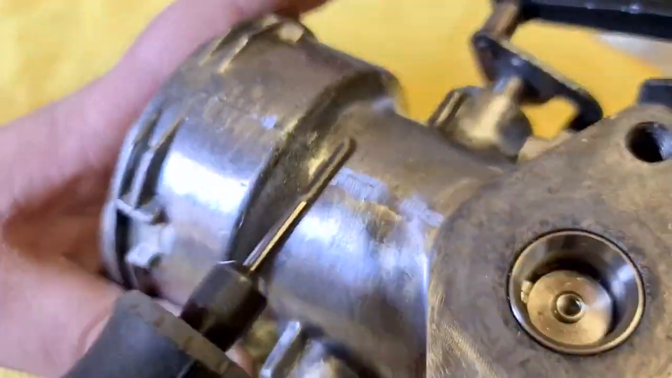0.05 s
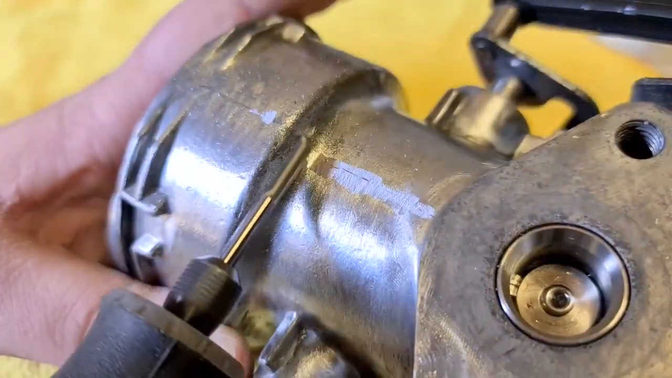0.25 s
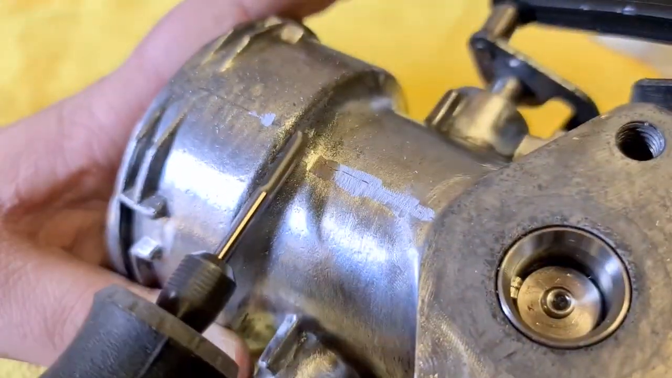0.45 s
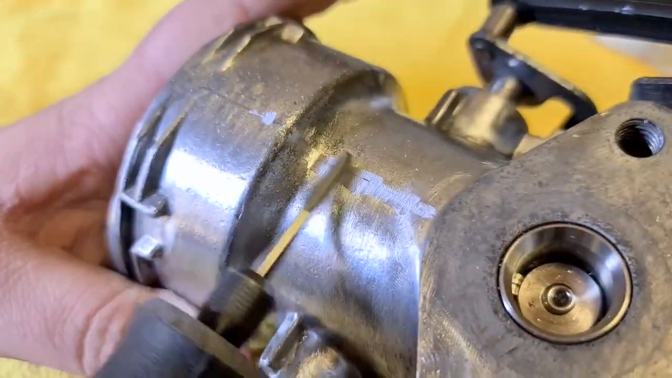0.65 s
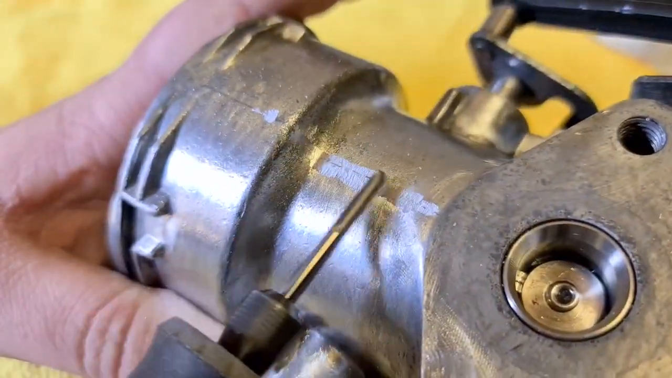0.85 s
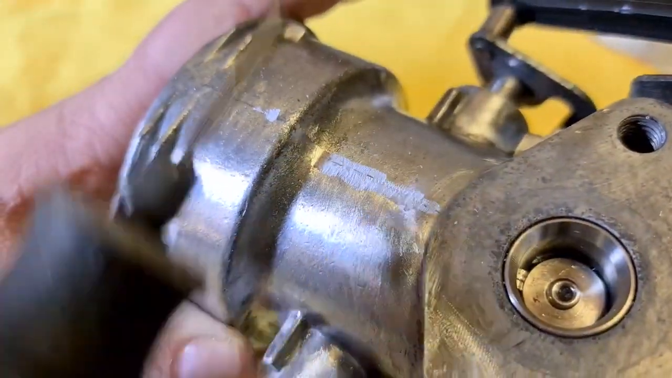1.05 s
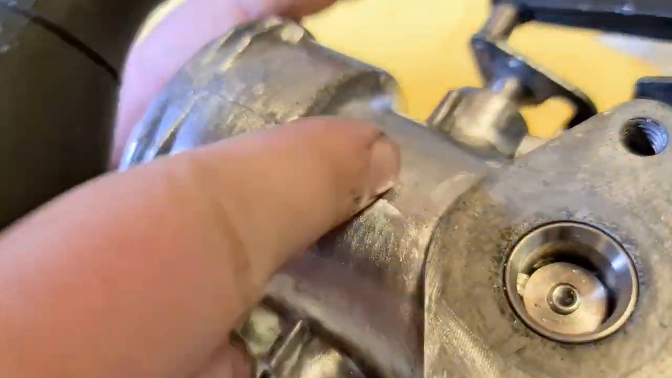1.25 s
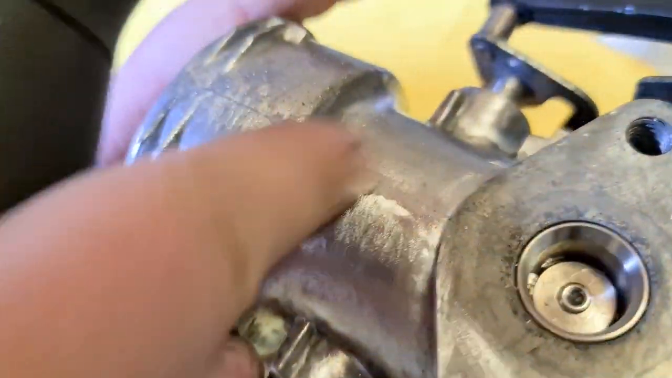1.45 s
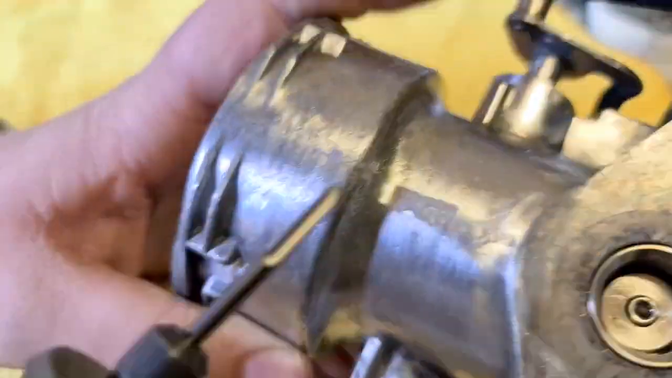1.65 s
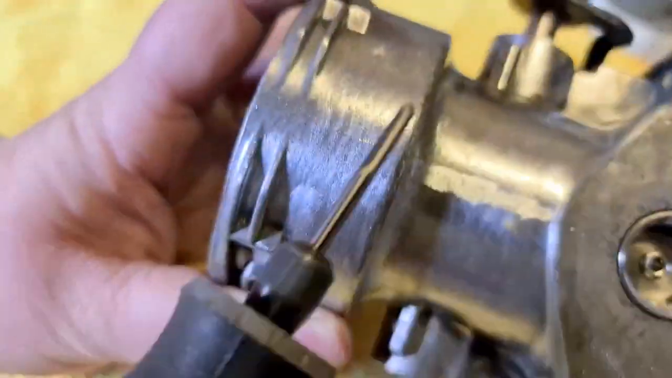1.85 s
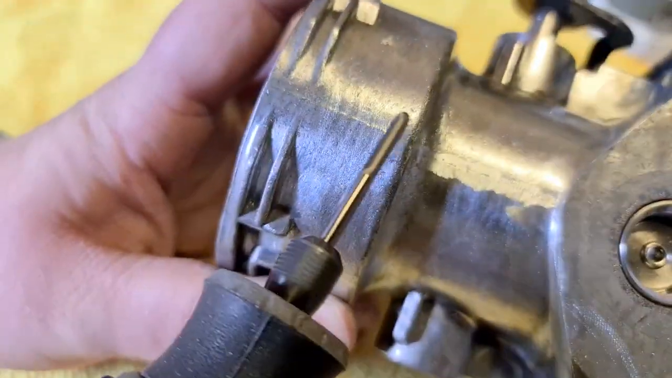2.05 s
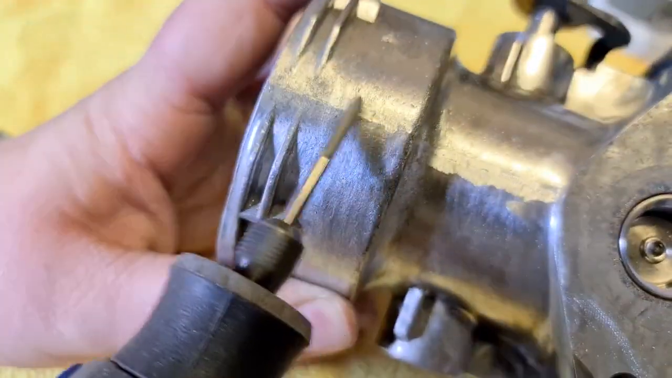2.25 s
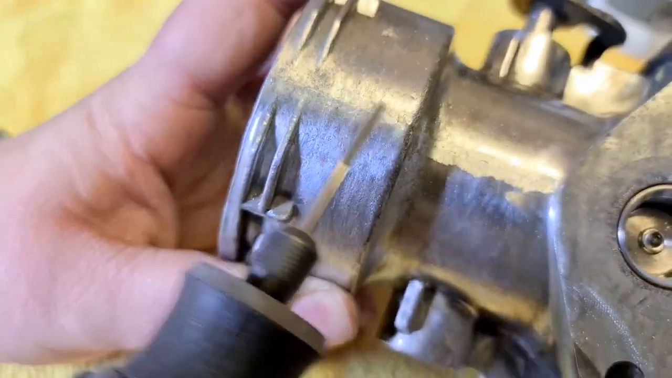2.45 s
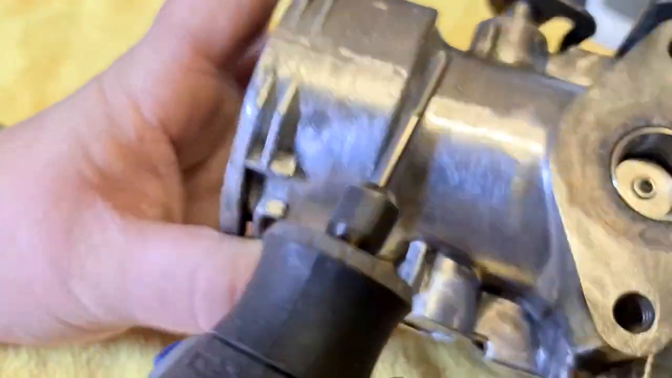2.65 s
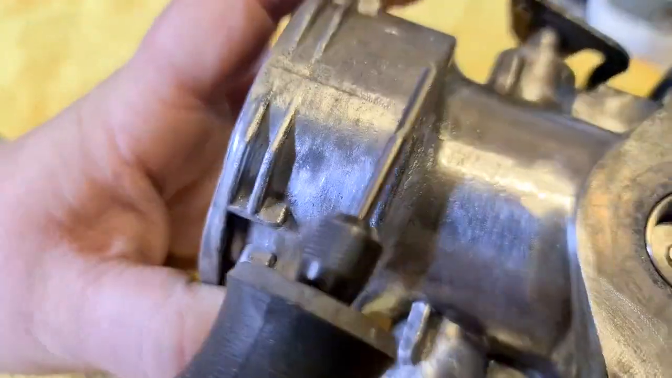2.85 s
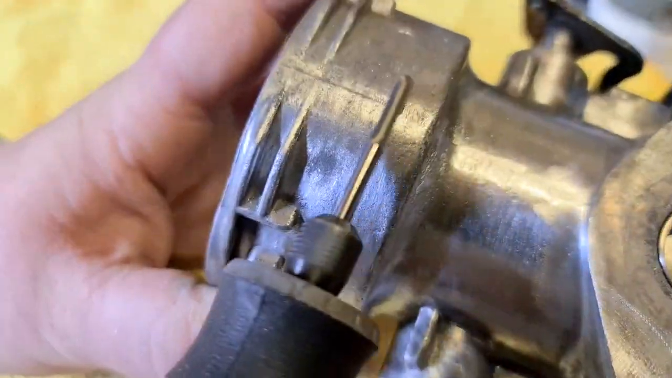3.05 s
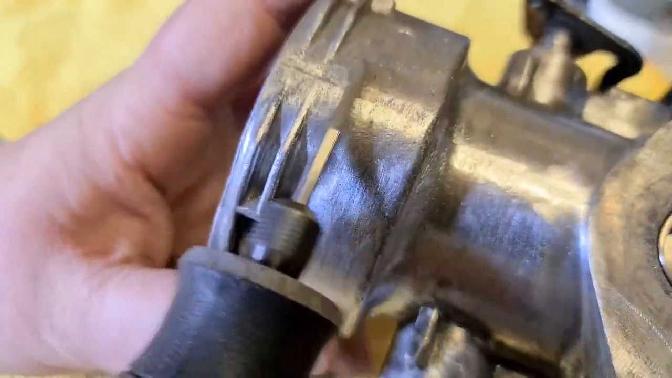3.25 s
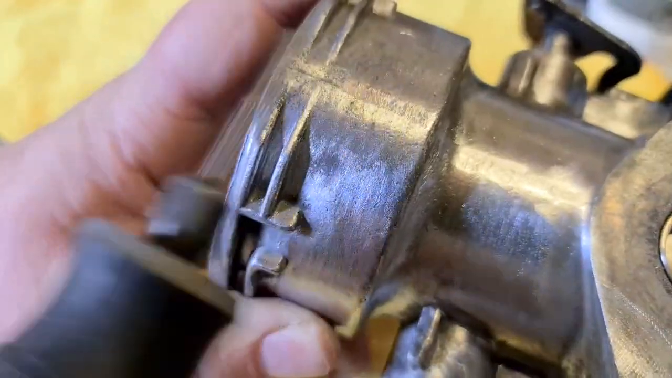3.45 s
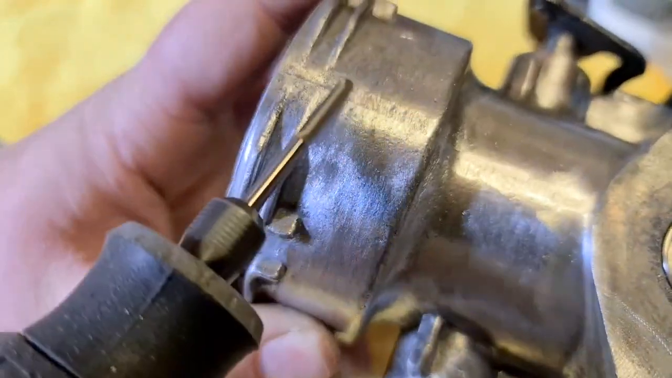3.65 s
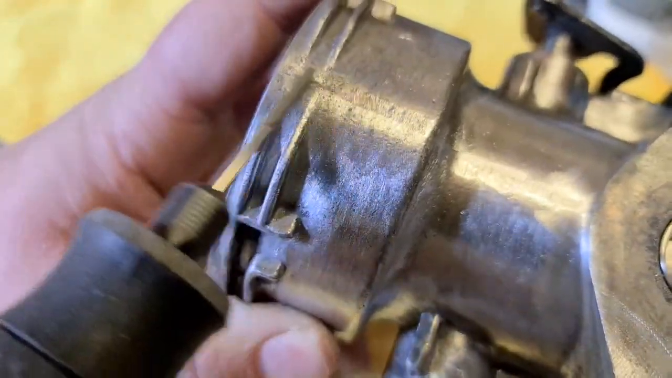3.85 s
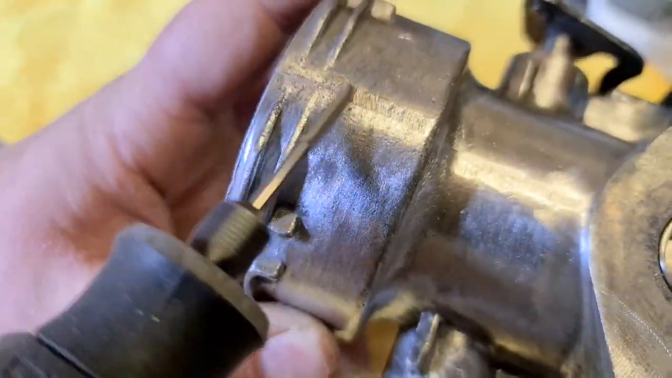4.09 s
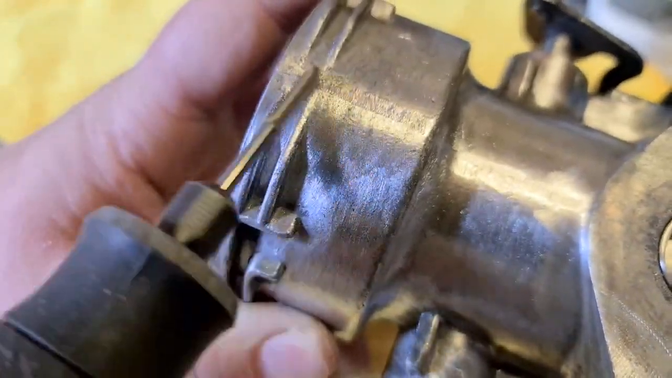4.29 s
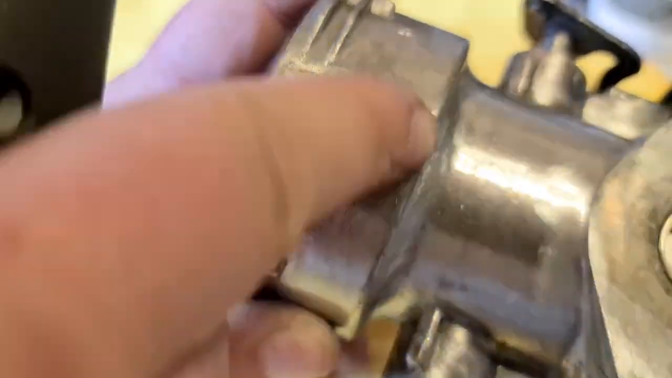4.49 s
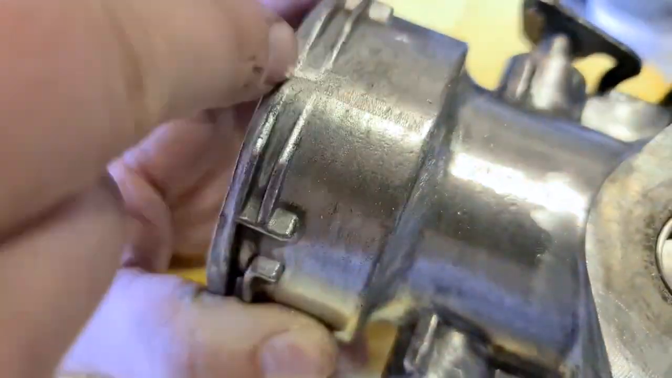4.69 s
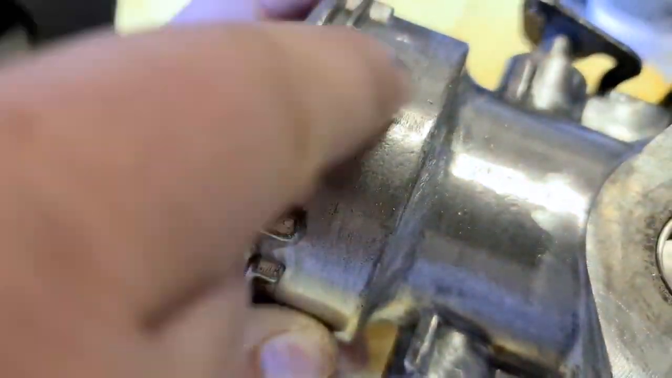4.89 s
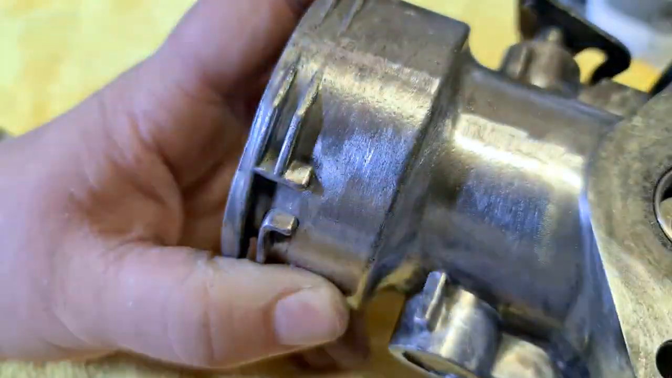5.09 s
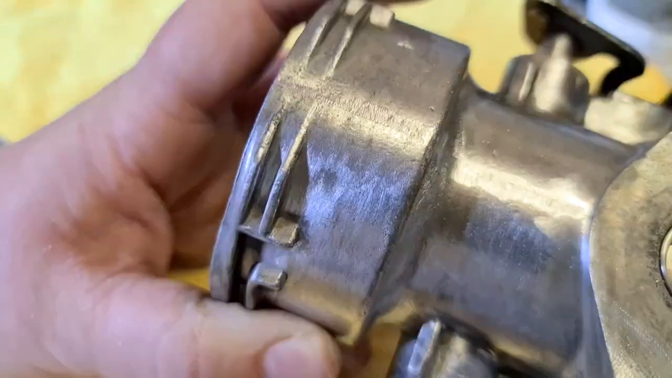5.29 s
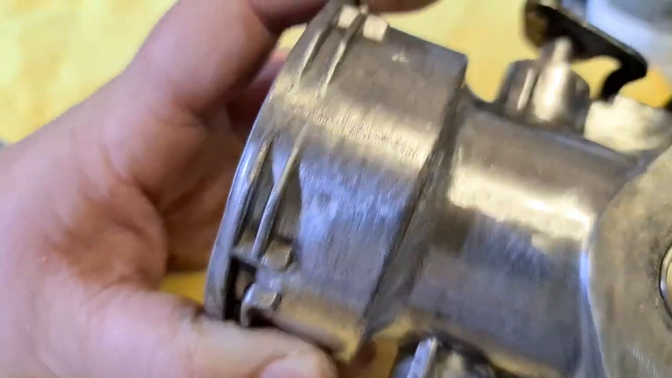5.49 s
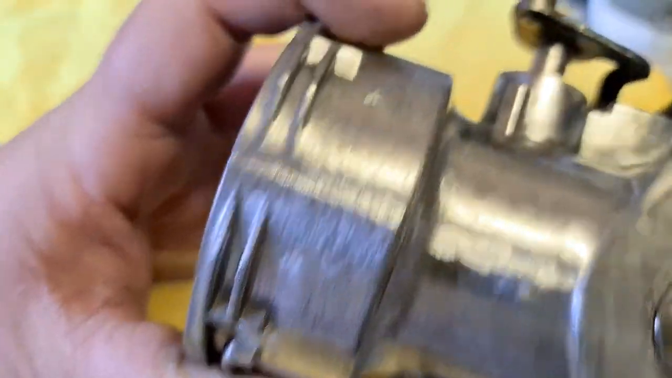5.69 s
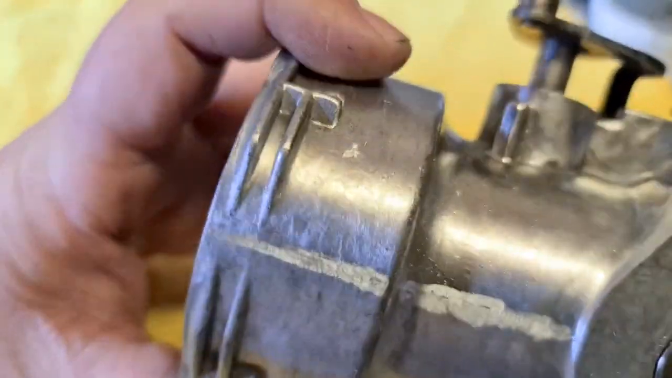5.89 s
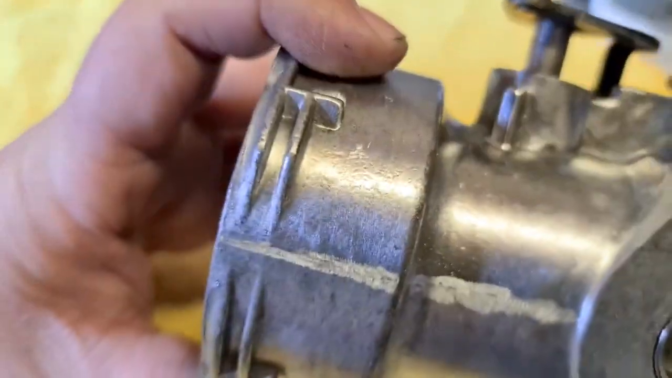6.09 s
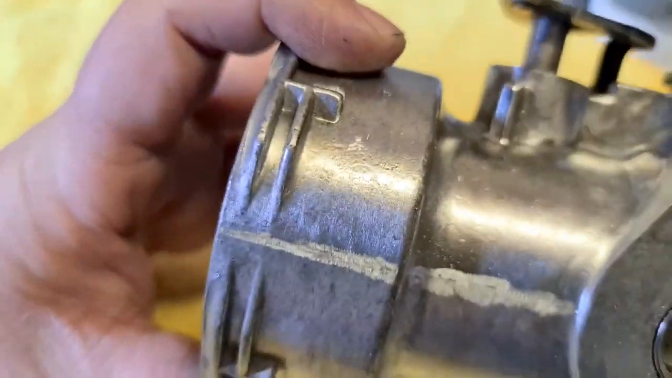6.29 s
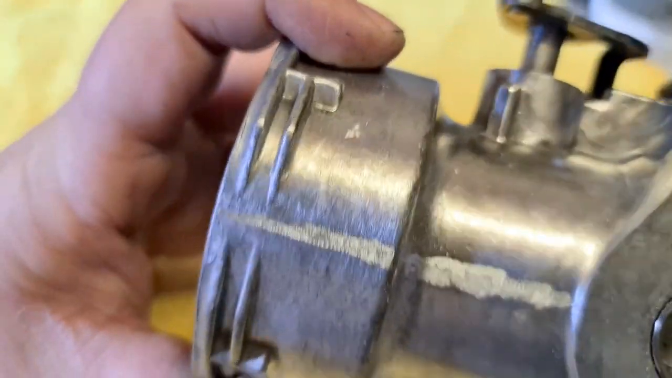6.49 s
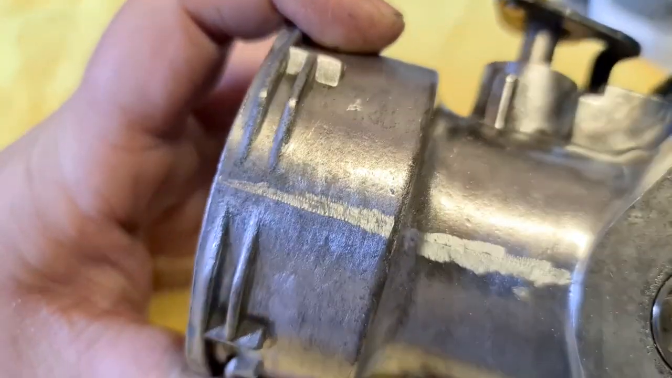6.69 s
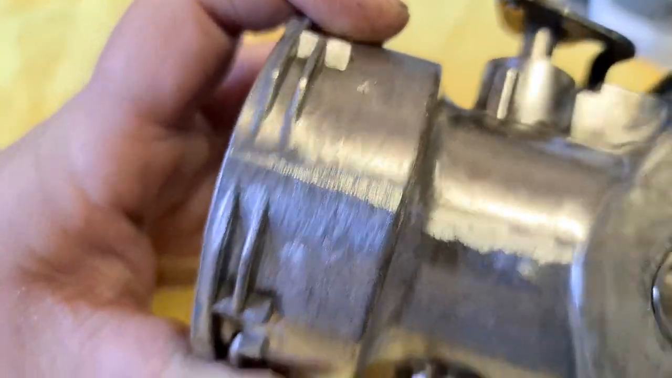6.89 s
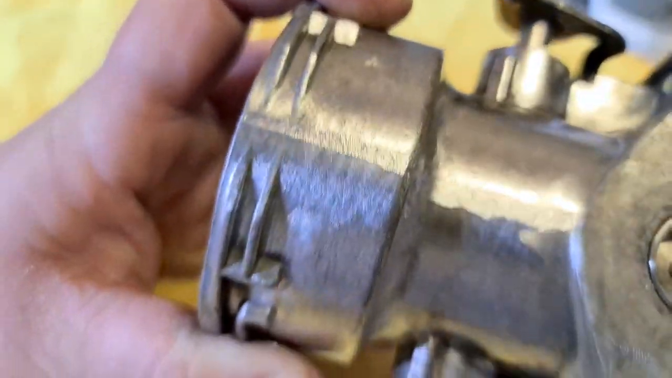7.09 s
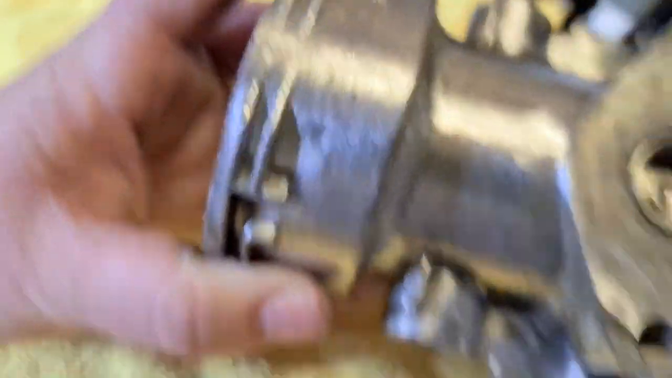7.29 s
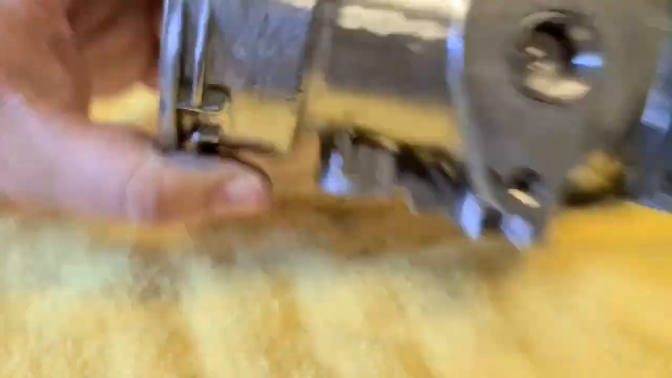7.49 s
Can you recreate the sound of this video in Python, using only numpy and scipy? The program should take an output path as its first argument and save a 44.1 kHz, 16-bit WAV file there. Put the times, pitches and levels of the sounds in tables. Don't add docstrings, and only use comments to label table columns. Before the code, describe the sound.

A small rotary tool, heard close in stereo and slightly left, runs six times too fast: a thin, high whine with bright fan air, fizzing brush hiss, sped-up mains hum and soft hand rustle. From 0.3 to 0.85 s its burr touches cast metal in light, stuttering chirps, with two more around 1.05 s. Then only the motor and handling until 2.2 s, when louder, piercing bites come until 2.5 s. Denser buzzing scrapes run 3.0-3.45 s, and a long, shrill, gritty flurry 3.8-4.5 s. The motor runs free, is laid aside at 5.1 s and grows duller. At 5.3 s it zips upward in pitch. At 5.4 s the pace becomes normal: a roaring whir with bearing noise, uneven ticking and several whines gliding steadily downward, fading over about two seconds into low mains hum, quiet room air and faint microphone hiss.

```python
import sys
import numpy as np
from scipy import signal
from scipy.fft import rfft, irfft, next_fast_len
from scipy.io import wavfile
from scipy.ndimage import uniform_filter1d

SR = 44100
rng = np.random.default_rng(int(sys.argv[2]) if len(sys.argv) > 2 else 0)


def put_to_file(sound):
    columns = np.atleast_2d(sound).T
    safe = np.clip(columns, -1, 1)
    whole_steps = np.round(safe * 32767)
    wavfile.write(sys.argv[1], SR, whole_steps.astype(np.int16))


def volts(x):
    e = np.asarray(x, float) / 20
    return 10 ** e


N = 332514

PACE, PACE_DROPS_S = 6, 5.392
ASIDE_S, ASIDE_FADE_S = 5.11, 0.04
BARS, BLADES, SLOTS = 8, 18, 16
NEAR_LAG, TOOL_LAG, DESK_LAG = 2, 8, 11
PULL_HZ = np.full(N, 2 * PACE * 50.05)
COAST_FROM = 404.4
TOP_HZ = 15740


def in_time(rows):
    s, *columns = np.transpose(rows)
    return [np.interp(seconds(), s, column) for column in columns]


def at_hz(points, hz):
    points = np.array(points)
    return np.interp(np.log(np.maximum(hz, 1)), np.log(points[:, 0]), points[:, 1])


def seconds():
    return np.arange(N) / SR


def ramp(start, length):
    return np.clip((seconds() - start) / length, 0, 1)


def drift(rate):
    r = np.exp(-40 * np.pi * rate / SR)
    slow = signal.lfilter([1], [1, -2 * r, r * r], rng.standard_normal(N // 20 + 3002))[3000:]
    return np.interp(np.arange(N) / 20, np.arange(len(slow)), slow / slow.std())


def ports(left, right, pan_db, lag):
    late = np.interp(np.arange(N) - np.round(lag), np.arange(N), right)
    return np.array([left * volts(pan_db / 2), late * volts(-pan_db / 2)])


def noise(spectrum, alike, pan_db, lag):
    size = next_fast_len(N)
    shape = volts(at_hz(spectrum, np.fft.rfftfreq(size, 1 / SR)))
    shared, own = irfft(shape * rfft(rng.standard_normal((2, size))), size)[:, :N]
    right = alike * shared + np.sqrt(1 - alike ** 2) * own
    return ports(shared, right, pan_db, lag) / shared.std()


def tone(hz, db):
    return np.sqrt(2) * volts(db) * np.sin(2 * np.pi * (np.cumsum(hz) / SR + rng.random()))


def shaft():
    # time in seconds, speed in turns per second.
    spin = [(0.0, 1436), (0.25, 1434.5), (0.45, 1415.5), (0.6, 1407.5), (0.9, 1415.5), (1.35, 1451),
            (1.5, 1450.5), (2.1, 1421), (2.4, 1379.5), (2.55, 1374), (2.7, 1392), (3.0, 1400), (3.45, 1357),
            (3.6, 1374), (4.2, 1373.5), (4.6, 1399), (5.1, 1391), (5.295, 1398)]
    dial_s, climb_s, top_spin = 5.302, .031, 2670
    cut_s, cut_loss_per_s2 = 5.372, 8500
    held, = in_time(spin)
    climb = 1 - np.exp(-np.clip(seconds() - dial_s, 0, cut_s - dial_s) / climb_s)
    return held + (top_spin - held) * climb - cut_loss_per_s2 * np.clip(seconds() - cut_s, 0, .1)


def shaft_coasting():
    friction, crawl = 150.84, 20
    drag_spin = 527.8
    angle = np.arctan(COAST_FROM / drag_spin) - friction / drag_spin * np.maximum(seconds() - PACE_DROPS_S, 0)
    return np.maximum(drag_spin * np.tan(angle), crawl)


def held_levels(turns):
    # time in seconds, vents towards the ports as brush hiss in dB,
    # looseness of the grip as shaft wobble in dB.
    hold = [(0.0, -42, -50), (0.145, -45, -57), (0.17, -51, -60), (0.52, -43, -60), (0.85, -50.5, -62),
            (1.0, -48.5, -58), (1.19, -45, -57), (1.23, -41, -48), (1.57, -39, -48.5), (1.64, -50, -60),
            (1.72, -44, -51), (2.54, -47, -52), (3.2, -44.5, -53), (3.65, -45, -49), (4.52, -44, -49.5),
            (4.8, -46, -48.5), (4.91, -50.5, -61.5), (5.03, -40, -46)]
    vents_db, grip_db = in_time(hold)
    aside = ramp(ASIDE_S, ASIDE_FADE_S)
    air_db = -46 + 0.3 * (vents_db - vents_db.mean()) - 8 * aside
    air_db = air_db + 1.77 * 20 * np.log10(turns / turns[0])
    return air_db, vents_db - 14.5 * aside, grip_db - 23.5 * aside


def fan_air(air_db):
    # frequency in Hz, density in dB per Hz.
    air_colour = [(940, -31), (1600, -11.5), (2580, -3), (2700, 1), (2980, -1.5), (4080, 3), (6250, 1.5),
                  (7120, 4.5), (8640, -0.5), (11000, -1), (14300, -8.5), (22000, -120)]
    return volts(air_db + 10.0 + 1.9 * drift(19.3)) * noise(air_colour, alike=0.63, pan_db=3.0, lag=NEAR_LAG)


def brush_hiss(hiss_db):
    # frequency in Hz, density in dB per Hz.
    hiss_colour = [(5300, -56), (9000, -19.5), (10500, -9), (12400, -8.5), (14500, -11), (16000, -10)]
    throb = 1 + 0.45 * tone(PULL_HZ, -1)
    return volts(hiss_db + 9.0 + drift(12)) * throb * noise(hiss_colour, alike=0.34, pan_db=10.0, lag=NEAR_LAG)


def commutator_comb(turns, hiss_db):
    lines_db = [-5, 1, -2, 1, -2, 1, -2, -8]
    aside = ramp(ASIDE_S, ASIDE_FADE_S)
    comb = np.zeros(N)
    for k, line_db in enumerate(lines_db):
        db = 2 + hiss_db + line_db + 1.5 * drift(5)
        db = db + 0.2 * min(k, 4) * (hiss_db + 41)
        if k < 3:
            db = db + 6 * aside
        comb += tone(BARS * turns + (k - 1) * PULL_HZ, db)
    return comb


def shaft_wobble(turns, wobble_db, hiss_db):
    first = tone(turns, wobble_db + 3.0 + 0.98 * drift(26))
    return first + tone(3 * turns, hiss_db - 11.0 + 1.5 * np.tanh(drift(5.1)))


def rev_up(turns):
    # time in seconds, shaft wobble in dB, commutator whine in dB.
    rev = [
        (5.295, -70, -70),
        (5.304, -60, -42),
        (5.322, -49, -33),
        (5.335, -41, -60),
        (5.37, -30, -80),
        (5.392, -45, -80),
    ]
    wobble_db, whine_db = in_time(rev)
    whine_hz = np.minimum(BARS * turns, SR / 2.5) + 300 * drift(400)
    return tone(turns, wobble_db) + tone(whine_hz, whine_db)


def field_buzz():
    return ramp(2.1, 0.059) * (1 - ramp(2.58, 0.035)) * tone(PULL_HZ, -59 - 3)


def running(turns):
    air_db, hiss_db, wobble_db = held_levels(turns)
    steady = turns < 1500
    lines = steady * commutator_comb(turns, hiss_db) + field_buzz() + rev_up(turns)
    wobble = steady * shaft_wobble(turns, wobble_db, hiss_db)
    sound = fan_air(air_db) + brush_hiss(hiss_db)
    return sound + ports(lines, lines, 8, NEAR_LAG) + ports(wobble, wobble, 12.1, TOOL_LAG)


def pressure(size):
    x = np.linspace(0, 1, size)
    edges = np.minimum(1, np.minimum(x, 1 - x) * size / (0.0012 * SR))
    return edges * np.abs(np.sin(np.pi * x)) ** 0.4


def bites():
    # start in
    # seconds, length in seconds, ring in dB, thud in dB.
    touches = [
        (.298, .022, -46, -32),
        (.366, .023, -25, -31),
        (.404, .022, -26, -30),
        (.742, .008, -27, -28),
        (.84, .01, -23, -27),
        (2.185, .013, -20, -23),
        (2.229, .02, -22, -23),
        (3.176, .02, -22, -28),
        (3.362, .02, -28, -28),
        (4.366, .026, -21, -26),
               (0.3163, 0.0299, -27.9, -29.0), (0.3452, 0.0494, -30.0, -31.0), (0.3921, 0.0394, -29.4, -30.2),
            (0.431, 0.0349, -36.4, -32.7), (0.4809, 0.0109, -34.2, -29.1), (0.4724, 0.0499, -39.4, -37.5),
            (0.5238, 0.0269, -31.3, -34.3), (0.5547, 0.0195, -36.1, -33.0), (0.5742, 0.0125, -38.3, -34.2),
            (0.5857, 0.008, -37.5, -32.3), (0.5922, 0.0145, -38.2, -34.0), (0.6056, 0.013, -36.4, -39.8),
            (0.6171, 0.0279, -37.3, -39.1), (0.6425, 0.0355, -42.2, -38.4), (0.6615, 0.0309, -30.4, -36.1),
            (0.6724, 0.0215, -30.4, -30.4),
               (0.7169, 0.009, -34.0, -26.9), (0.7178, 0.028, -39.4, -26.6),
                (0.7388, 0.0325, -30.5, -27.1), (0.7523, 0.0075, -27.0, -29.3),
                (0.7623, 0.007, -23.3, -28.9), (0.7822, 0.0055, -36.3, -35.3), (0.7862, 0.02, -32.8, -35.8),
                (0.8201, 0.017, -21.9, -27.9), (0.8356, 0.014, -27.3, -26.3),
                (1.0142, 0.0339, -39.5, -25.6), (1.0366, 0.043, -31.4, -23.4),
                (1.0581, 0.0075, -27.5, -24.5), (1.0706, 0.009, -23.9, -24.1),
               (2.1845, 0.0205, -23.2, -24.8), (2.215, 0.0045, -42.9, -38.0),
                  (2.2279, 0.0299, -24.6, -26.1), (2.2574, 0.022, -27.7, -28.0),
                  (2.2753, 0.011, -24.4, -23.7), (2.2828, 0.018, -23.2, -26.1),
                  (2.2983, 0.0155, -22.9, -27.2), (2.3057, 0.022, -31.3, -24.0),
                  (2.3247, 0.0215, -20.4, -24.5), (2.3507, 0.0264, -25.8, -27.5),
                  (2.3891, 0.014, -27.3, -27.4), (2.4025, 0.0105, -27.2, -30.4),
                  (2.4474, 0.0155, -21.6, -23.0), (2.5078, 0.014, -23.8, -25.0),
               (3.0321, 0.013, -31.6, -25.2), (3.0441, 0.012, -36.3, -30.3), (3.0615, 0.007, -47.4, -33.8),
              (3.0725, 0.0165, -33.1, -24.0), (3.0895, 0.0115, -33.8, -24.1), (3.0995, 0.017, -34.5, -32.3),
              (3.1139, 0.061, -32.0, -30.3), (3.1374, 0.0189, -25.1, -31.3), (3.1553, 0.0135, -24.9, -32.2),
              (3.1678, 0.0414, -24.6, -25.9), (3.2087, 0.0095, -35.0, -29.1),
              (3.2167, 0.0215, -34.1, -24.9), (3.2277, 0.017, -26.5, -32.2), (3.2586, 0.0185, -29.6, -25.4),
              (3.2666, 0.018, -29.5, -34.5), (3.3, 0.012, -30.0, -23.7), (3.3115, 0.01, -29.2, -31.0),
              (3.3404, 0.0109, -31.2, -26.5), (3.3474, 0.017, -31.8, -28.9), (3.3639, 0.0095, -32.0, -29.3),
              (3.3458, 0.0749, -34.5, -27.4), (3.4192, 0.017, -35.3, -26.5), (3.4352, 0.006, -34.9, -27.2),
              (3.4407, 0.0115, -34.9, -28.4), (3.4502, 0.0135, -32.4, -29.6),
               (3.8183, 0.007, -28.3, -32.8), (3.8298, 0.019, -22.6, -27.0),
                    (3.8502, 0.0105, -32.3, -38.7), (3.8602, 0.0349, -26.1, -29.7),
                    (3.8932, 0.0095, -26.4, -27.3), (3.9036, 0.0095, -29.8, -32.1),
                    (3.9106, 0.0534, -27.2, -29.5), (3.9655, 0.0424, -24.9, -26.6),
                    (4.0219, 0.0105, -29.7, -32.3), (4.0318, 0.01, -30.0, -35.5),
                    (4.0558, 0.0095, -29.3, -34.4), (4.0707, 0.0409, -25.4, -30.0),
                    (4.0987, 0.0215, -23.4, -27.3), (4.1221, 0.008, -29.1, -35.2),
                    (4.1356, 0.01, -30.8, -39.5), (4.1461, 0.0125, -23.3, -27.2),
                    (4.1475, 0.0429, -23.4, -27.1), (4.189, 0.0274, -25.3, -30.0),
                    (4.2164, 0.014, -26.2, -27.6), (4.2334, 0.009, -26.7, -32.0),
                    (4.2419, 0.0409, -23.6, -26.9), (4.2788, 0.015, -31.8, -26.4),
                    (4.3062, 0.023, -24.5, -29.5), (4.3541, 0.0434, -22.9, -27.4),
                    (4.4015, 0.0095, -23.4, -29.3), (4.415, 0.013, -24.7, -30.3),
                    (4.4319, 0.0065, -34.7, -34.3), (4.4614, 0.009, -23.2, -28.7)]
    ring, thud = np.zeros(N), np.zeros(N)
    for s, length, ring_db, thud_db in np.array(touches):
        start, size = int(s * SR), int(length * SR)
        bump = pressure(size)
        span = slice(start, start + size)
        ring[span] = np.maximum(ring[span], volts(ring_db) * bump)
        thud[span] = np.maximum(thud[span], volts(thud_db) * bump)
    return ring, thud


def sway_db(order):
    depth_db = {11: 0, 3: 1}.get(order, 2)
    return depth_db * np.tanh(drift(60))


def burr(turns):
    # multiple of the shaft, level in dB.
    thudding = [(2, -10), (3, 0), (3.5, -17), (4, -17), (5, -21)]
    # multiple of the shaft, level in dB.
    ringing = [(7, -21), (7.5, -23), (8, -16), (10, -18), (10.5, -20), (11, 0)]
    # start in seconds, extra dB on the 4th order, on the orders between, on the 2nd.
    passes = [
        (0.0, -1, 4, 0),
        (2.0, -3, -2, -2),
        (2.8, 8, 0, 1),
        (3.6, -1, -3, 0),
    ]
    # frequency in Hz, gain in dB.
    casting = [(9000, 0), (13750, 0), (14250, 4), (14900, 0), (16000, 0)]
    # frequency in Hz, density in dB per Hz.
    grit_colour = [(1500, -16), (2500, -71), (4200, 9.5), (6500, 0), (9000, 10), (11000, 11.5),
                   (13500, -17), (15200, 26.5), (16500, 2)]
    ring, thud = bites()
    shake_db = .7 * np.tanh(drift(90))
    uneven = turns + 1.5 * drift(80)
    starts, *by_pass = np.transpose(passes)
    now = np.searchsorted(starts, seconds(), "right") - 1
    fourth_db, between_db, second_db = np.array(by_pass)[:, now]
    extra_db = dict.fromkeys((3.5, 5, 7, 7.5, 10.5), between_db)
    extra_db.update({2: second_db, 4: fourth_db})
    low, high = np.zeros(N), np.zeros(N)
    for k, db in thudding:
        low += tone(k * uneven, db - 3.5 + extra_db.get(k, 0) + sway_db(k))
    for k, db in ringing:
        high += tone(k * uneven, db + at_hz(casting, k * turns) + shake_db + extra_db.get(k, 0) + sway_db(k))
    grit = volts(1.5 + shake_db) * np.sqrt(ring * thud) * noise(grit_colour, alike=0.58, pan_db=1.5, lag=NEAR_LAG)
    return ports(ring * high, ring * high, 16.2, NEAR_LAG) + ports(thud * low, thud * low, 4.4, NEAR_LAG) + grit


def outlet():
    # frequency in Hz, density in dB per Hz.
    jet_colour = [(3000, -24), (5200, -3), (7100, 0), (8800, -4), (11000, -30)]
    facing = ramp(1.8, .3) * (1 - ramp(4.6, .3))
    return facing * volts(-40 + 0.62 * drift(15.0)) * noise(jet_colour, alike=0.48, pan_db=7.0, lag=NEAR_LAG)


def slower_db(turns):
    return 20 * np.log10(turns / COAST_FROM)


def rolling_db(turns):
    stops = 37.5
    return 20 * np.log10(np.maximum(turns - stops, 5) / (COAST_FROM - stops))


def housing_roar(turns):
    # frequency in Hz, density in dB per Hz.
    roar_colour = [(120, -50), (300, -13), (600, -9), (800, -2), (1040, -3), (1150, -4), (1280, -2),
                   (2150, -0.5), (2500, -7), (3600, -8), (5800, -13.5), (7000, -60), (9000, -43)]
    db = -35 + 1.525 * rolling_db(turns) + 2.5 + drift(23.0)
    return volts(db) * noise(roar_colour, alike=0.49, pan_db=1.5, lag=DESK_LAG)


def coasting_air(turns):
    # frequency in Hz, density in dB per Hz.
    coast_colour = [(3820, -16.5), (6500, 4.5), (7060, -2), (7880, -0.5), (8560, 8), (11000, 8),
                    (13100, -2), (15100, 1.5), (16000, -28)]
    db = -40 + 2.38 * slower_db(turns) + 5.5 + drift(5.7)
    return volts(db) * noise(coast_colour, alike=0.054, pan_db=3.5, lag=DESK_LAG)


def gliding_tones(turns):
    # frequency in Hz, level in dB.
    fan_path = [(800, -82), (1150, -59), (1450, -63), (1950, -59), (2450, -65), (2800, -56), (3500, -61),
                (3900, -53), (4500, -56), (5500, -52), (6150, -46), (6500, -55), (6800, -50), (7300, -38)]
    # frequency in Hz, level in dB.
    slot_path = [(700, -90), (1700, -79), (2800, -66), (3100, -58), (3300, -52), (3550, -49), (3900, -57),
                 (4500, -65), (5000, -53), (5500, -62), (6050, -57), (6500, -65)]
    # frequency in Hz, level in dB.
    fan_second = [(6000, -86), (8500, -72), (9500, -66), (11500, -61), (14500, -68)]
    fan_hz, slot_hz = BLADES * turns, SLOTS * turns
    lines = tone(fan_hz, at_hz(fan_path, fan_hz) + 3.5 + 1.5 * np.tanh(drift(40)))
    lines += tone(slot_hz, at_hz(slot_path, slot_hz) + 2.5 + 2 * np.tanh(drift(30)))
    lines += tone(turns, -38.5 + 4.64 * slower_db(turns) - 1.0 + 2.5 * np.tanh(drift(14)))
    lines += tone(2 * fan_hz, at_hz(fan_second, 2 * fan_hz) + 3 * np.tanh(drift(20)))
    return lines


def bar_ticks(turns):
    # frequency in Hz, level in dB.
    tick_path = [(1200, -20), (2600, -13), (3600, -3), (4600, -6), (5600, -4), (7000, -11), (9000, -7),
                 (10600, -1), (12000, -9), (16000, -18)]
    odd_bars = {24: -8, 25: -5, 27: 5, 28: 5, 32: -3, 36: -3, 40: -6, 47: 2, 57: 3, 62: 4, 64: -6, 66: 5,
                70: 5, 71: -4, 74: 8, 78: 8, 87: 3}
    after = slice(int(PACE_DROPS_S * SR), N)
    spin_down = turns[after]
    angle = 2 * np.pi * np.cumsum(spin_down) / SR
    tick_db = -48.5 + 1.6 * slower_db(spin_down) + 6.5
    flutter_db = [3.5 * drift(14)[after] for _ in range(5)]
    ticks = np.zeros(N)
    for k in range(19, 121):
        weaker_db = 7 * min(k % BARS, -k % BARS, 2)
        tilt_db = k / 20 + max(k - 88, 0) / 5
        db = at_hz(tick_path, k * spin_down) + tick_db + flutter_db[k % 5] + rng.normal(0, 1)
        db = db - weaker_db - tilt_db + odd_bars.get(k, 0)
        ticks[after] += (k * spin_down < TOP_HZ) * volts(db) * np.sin(k * angle + 7 * rng.random())
    return ticks


def shell(turns):
    # frequency in Hz, density in dB per Hz.
    shell_colour = [(700, -71), (950, -16), (1080, -10.5), (1150, -1), (1230, -12), (1400, -9.5),
                    (2000, -38)]
    knock = 1 + .7 * np.cos(2 * np.pi * np.cumsum(turns) / SR)
    db = -39.5 + 0.95 * rolling_db(turns)
    return knock * volts(db) * noise(shell_colour, alike=0.86, pan_db=4.5, lag=DESK_LAG)


def coasting(turns):
    lines = gliding_tones(turns) + bar_ticks(turns)
    return housing_roar(turns) + coasting_air(turns) + shell(turns) + ports(lines, lines, 8, DESK_LAG - 1)


def hands():
    # middle in seconds, length in seconds, rumble in dB, rustle in dB.
    shifts = [(0.0, 0.24, -52, -49), (0.244, 0.22, -93, -52), (0.55, 0.42, -55.5, -49.5),
              (1.41, 0.054, -56, -60), (1.506, 1, -48.5, -68), (2.01, 0.069, -54, -60),
              (2.965, 0.87, -60.5, -53.5), (3.263, 0.7, -90, -54.5), (3.558, 0.034, -88, -43),
              (3.628, 0.42, -75, -51), (4.565, 0.066, -53.5, -52), (4.83, 0.22, -51.5, -81),
              (4.925, 0.13, -55, -79), (5.128, 0.039, -46, -73)]
    bed_db = -8.5 * ramp(ASIDE_S, ASIDE_FADE_S)
    rumble_db = -51.5 - 10.5 * ramp(1.93, 0.009) + 2 * bed_db
    power = volts([2 * rumble_db, 2 * (-59 + bed_db)])
    for s, length, *db in shifts:
        swell = np.cos(np.pi * np.clip((seconds() - s) / length, -.5, .5)) ** 2
        power = power + volts(2 * np.array(db))[:, None] * swell
    return 10 * np.log10(power)


def surroundings():
    # frequency in Hz, density in dB per Hz.
    rumble_colour = [(30, -38), (80, -53), (160, -15), (250, -5), (370, -4), (480, -8.5), (700, -20)]
    # frequency in Hz, density in dB per Hz.
    rustle_colour = [(450, -3.5), (600, 1.5), (900, -1.5), (1300, 4), (2000, 0.5), (2600, -8.5)]
    rumble_db, rustle_db = hands()
    rumble = volts(rumble_db + 3.0 + drift(8)) * noise(rumble_colour, alike=0.33, pan_db=18.0, lag=TOOL_LAG)
    rustle = volts(rustle_db + 6.5 + 3.2 * drift(31)) * noise(rustle_colour, alike=0.77, pan_db=1.0, lag=TOOL_LAG)
    return rumble + rustle


def workshop():
    # frequency in Hz, density in dB per Hz.
    shop_colour = [(30, 6.5), (70, 5), (130, -8.5), (205, -7.5), (330, -4), (545, -10.5), (800, -26),
                   (3500, -11.5), (8000, -57), (16000, -30)]
    return volts(-61) * noise(shop_colour, alike=0.83, pan_db=3.3, lag=TOOL_LAG)


def mains_hum(fast):
    # multiple of the mains, level in dB.
    hum_lines = [(1, -48.5), (4, -73.5), (11, -74.5), (14, -81)]
    hum_hz = 49.5 * np.where(fast > .5, PACE, 1)
    return sum(tone(k * hum_hz, db + 0.4 * drift(8)) for k, db in hum_lines)


def self_noise():
    # frequency in Hz, density in dB per Hz.
    mic_colour = [(1500, -20), (3500, 0), (7000, -3), (10000, 0), (13500, -2), (16000, -10)]
    return volts(-70.5) * noise(mic_colour, alike=0, pan_db=0, lag=0)


def scene():
    fast = 1 - ramp(PACE_DROPS_S + .002, .003)
    turns = shaft()
    working = running(turns) + burr(turns) + outlet() + surroundings()
    bass_cut = signal.butter(2, 110, "high", fs=SR, output="sos")
    working = signal.sosfilt(bass_cut, working)
    resting = coasting(shaft_coasting()) + workshop()
    return fast * working + (1 - fast) * resting + mains_hum(fast) + self_noise()


def thinned(x):
    ring = signal.sosfilt(signal.butter(4, 14500, "high", fs=SR, output="sos"), x[0])
    ring_db = 10 * np.log10(np.abs(uniform_filter1d(ring ** 2, int(.023 * SR))) + 1e-12)
    early_db = -3 * ramp(.08, .06) * (1 - ramp(1.04, .06))
    loss_db = early_db - .25 * np.maximum(ring_db + 34, 0)
    band = signal.sosfiltfilt(signal.butter(3, (5800, 9600), "band", fs=SR, output="sos"), x)
    return x + (volts(loss_db) - 1) * band


def band_limit(x):
    return signal.sosfilt(signal.butter(12, 17140, fs=SR, output="sos"), x)


def record(dry):
    size = next_fast_len(N)
    over = np.clip((np.fft.rfftfreq(size, 1 / SR) - TOP_HZ) / 150, 0, 2)
    mix = irfft(rfft(thinned(dry), size) * volts(-30 * over ** 2), size)[:, :N]
    return band_limit(mix)


dry = scene()
out = record(dry)
put_to_file(out)
```